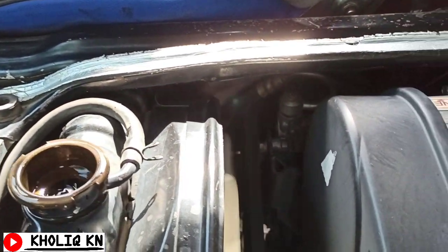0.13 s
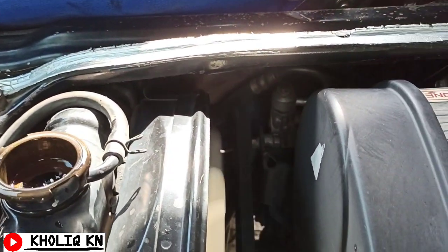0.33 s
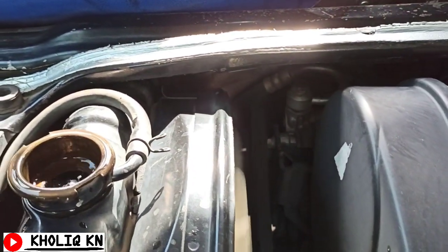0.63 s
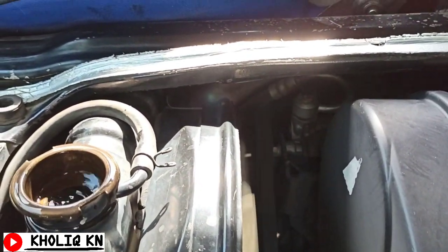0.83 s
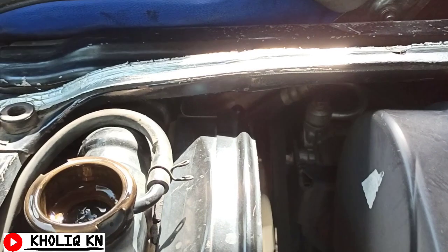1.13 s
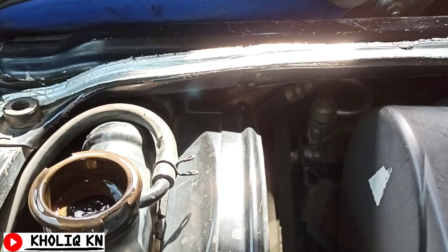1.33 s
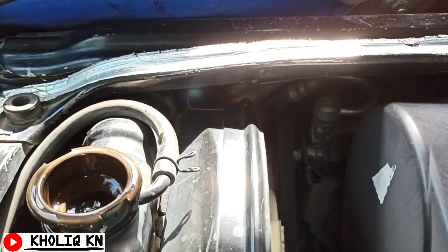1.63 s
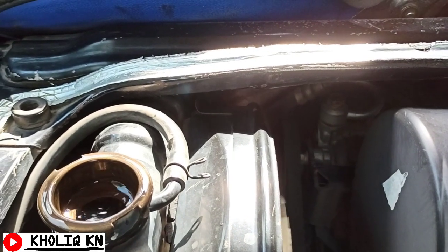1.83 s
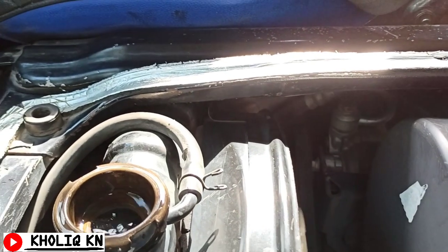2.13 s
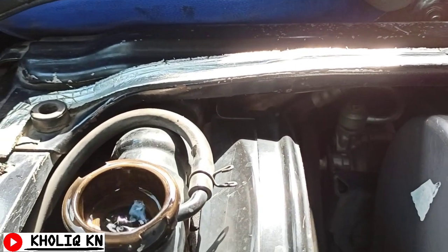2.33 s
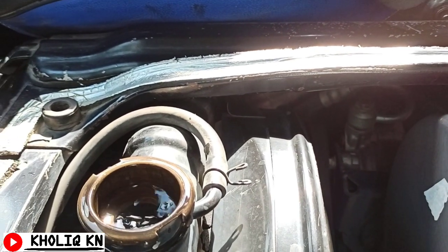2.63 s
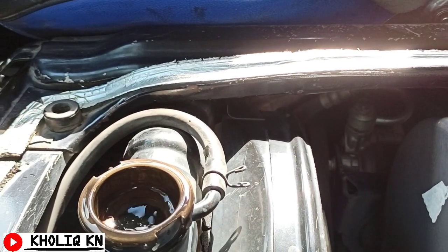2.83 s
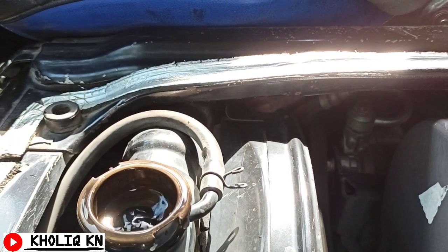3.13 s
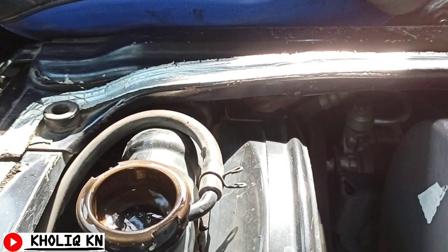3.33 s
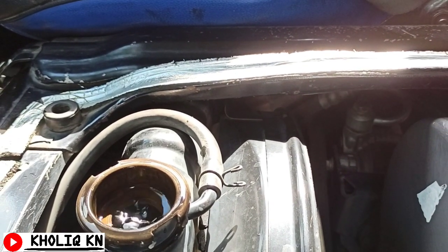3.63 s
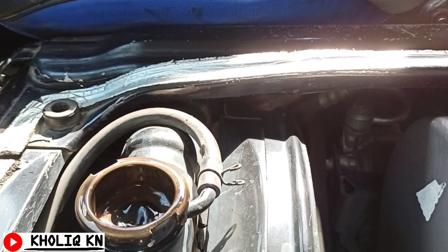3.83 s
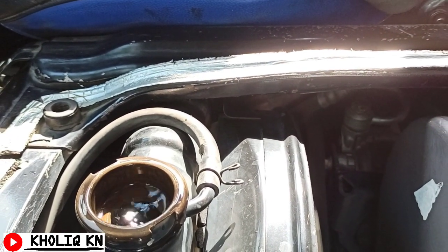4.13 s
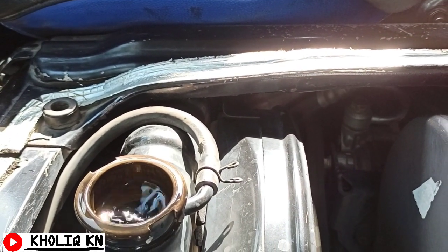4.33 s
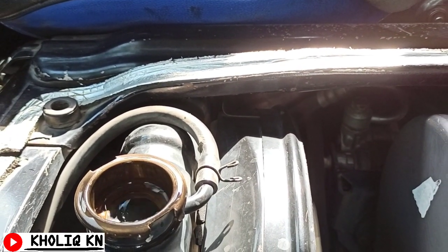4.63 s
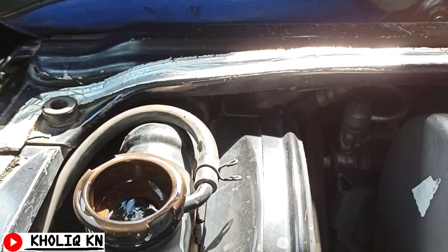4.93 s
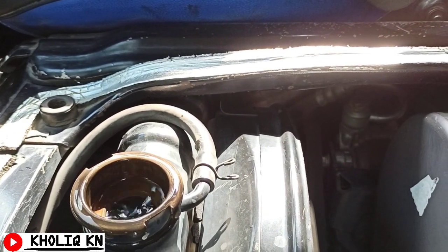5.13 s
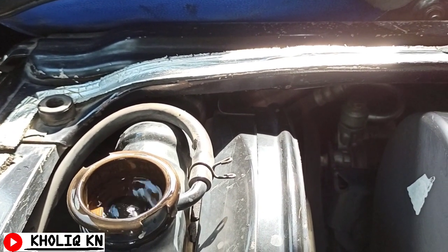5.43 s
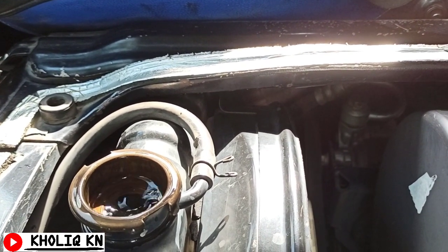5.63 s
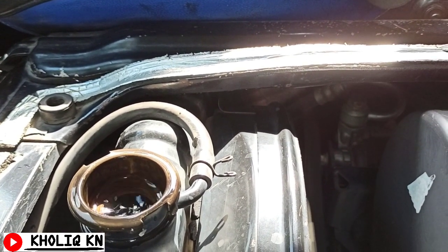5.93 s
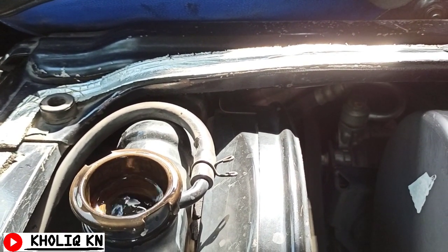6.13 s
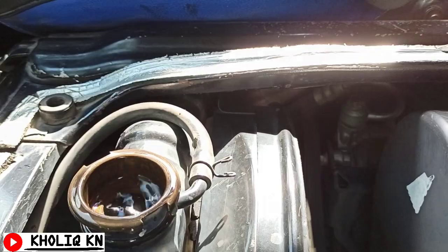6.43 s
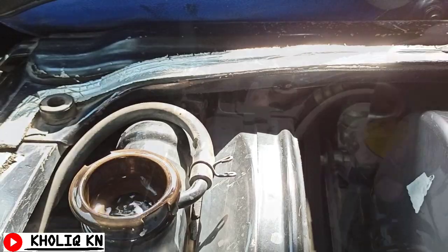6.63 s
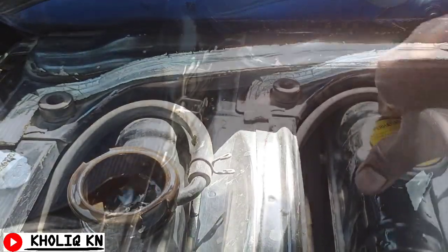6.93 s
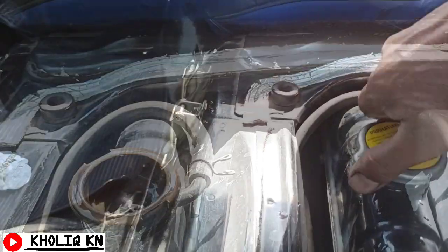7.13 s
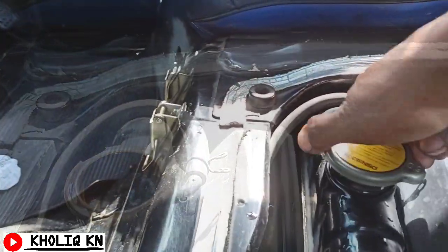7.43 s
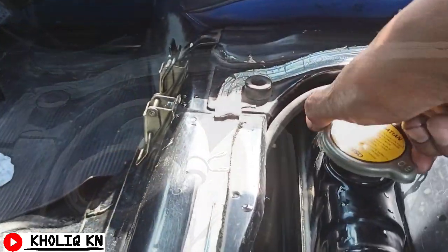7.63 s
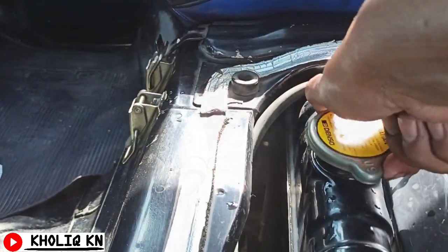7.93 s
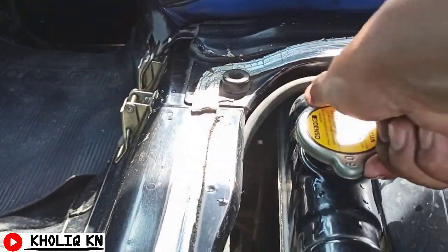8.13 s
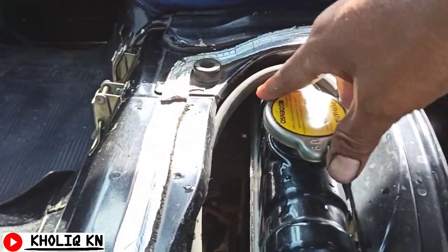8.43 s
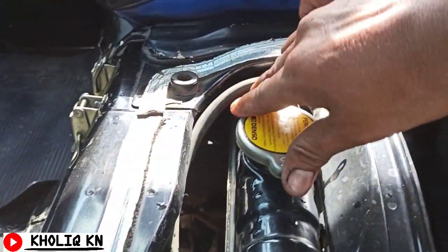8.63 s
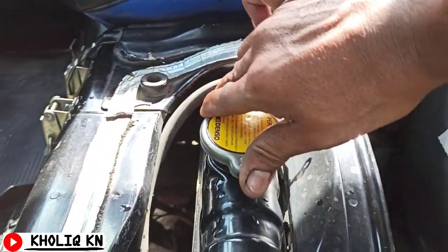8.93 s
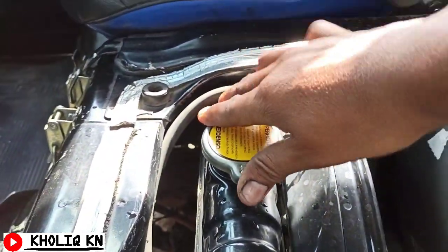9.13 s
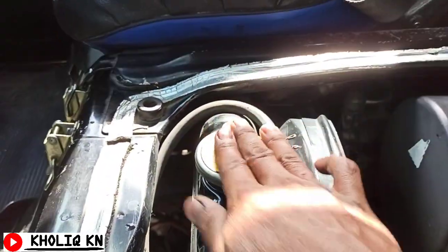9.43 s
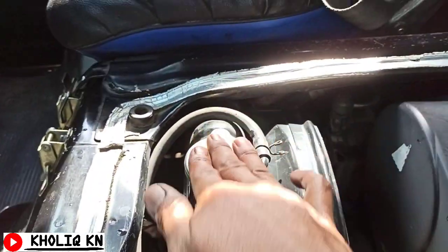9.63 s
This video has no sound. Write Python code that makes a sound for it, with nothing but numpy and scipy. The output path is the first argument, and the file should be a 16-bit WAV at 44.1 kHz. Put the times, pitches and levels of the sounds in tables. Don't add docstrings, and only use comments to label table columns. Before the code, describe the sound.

A four-cylinder diesel knocks at idle, revs up into a held roar with fan hum, dips, then clatters at idle again, with wind buffeting the left.

```python
import sys
import numpy as np
from scipy import signal
from scipy.fft import rfft, irfft
from scipy.io import wavfile
from scipy.ndimage import uniform_filter1d, map_coordinates

SR = 44100
rng = np.random.default_rng(int(sys.argv[2]) if len(sys.argv) > 2 else 0)


def volts(x):
    e = np.asarray(x, float) / 20
    return 10 ** e


def wav_record(signal):
    frames = np.transpose(np.atleast_2d(signal))
    bounded = np.clip(frames, -1, 1)
    quanta = np.round(bounded * 32767).astype(np.int16)
    wavfile.write(sys.argv[1], SR, quanta)


N = 432180
TIME, HZ = np.arange(N) / SR, np.fft.rfftfreq(N, 1 / SR)


def evened(x):
    return x / np.sqrt(np.mean(x ** 2) + 1e-20)


def read(points, hz):
    f, value = np.transpose(points)
    return np.interp(np.log(hz + 1), np.log(f + 1), value)


def curve(rows):
    return np.interp(TIME, *np.transpose(rows))


def add(mix, s, shape):
    part = mix[round(s * SR):][:len(shape)]
    part += shape[:len(part)]


def swell(since, rise_s, fall_s):
    return (1 - np.exp(-since / rise_s)) * np.exp(-since / fall_s)


def gust_shape(samples, peak_s):
    u = np.arange(samples) / SR / peak_s
    return u * np.exp(1 - u)


def ring(x, hz, width):
    r = np.exp(-np.pi * width / SR)
    return signal.lfilter([1 - r, 0, r - 1], [1, -2 * r * np.cos(2 * np.pi * hz / SR), r * r], x)


def slow(hz):
    coarse = TIME[::128]
    drift = map_coordinates(rng.standard_normal(2000), [coarse * hz * 2 + 5], order=3)
    return np.interp(TIME, coarse, evened(drift))


def noise(spectrum):
    a, b = rng.standard_normal((2, 2, len(HZ))) * np.sqrt(N / 2)
    return irfft((a + 1j * b) * volts(read(spectrum, HZ)), N)


# time in seconds, level in dB.
FADER = [
    (0.0, 0),
    (6.35, -0.5),
    (6.55, -4),
    (7.0, -9),
    (7.3, -10.5),
    (7.85, -8),
    (8.42, -2),
    (8.5, 2),
    (9.8, 0.5),
]


def fader_db():
    return curve(FADER)


def level_db(idle_db, speed_db, fast):
    return idle_db + (speed_db - idle_db) * fast ** 0.32 + fader_db()


# peak in seconds, peak level in dB, length in seconds.
GUSTS = [(0.04, -14.5, 0.016), (0.455, -9.5, 0.014), (0.673, -14, 0.023), (0.764, -3, 0.013),
         (0.969, -13, 0.017), (1.11, -14, 0.013), (1.21, -12, 0.025), (1.47, -9, 0.011),
         (1.763, -12, 0.024), (2.111, -6.5, 0.039), (3.206, -10.5, 0.0094), (3.353, -3, 0.0084),
         (3.592, -1, 0.025), (3.705, -9, 0.0098), (4.009, -6, 0.01), (4.091, -12, 0.016),
         (4.308, -11, 0.028), (4.958, 3, 0.008), (5.152, -2.5, 0.021), (5.576, -5, 0.027),
         (5.674, -9, 0.0038), (5.806, -8, 0.014), (6.13, -1.5, 0.037), (6.343, -4, 0.0095),
         (6.798, -14, 0.029), (6.948, -10.5, 0.028), (7.03, -14.5, 0.017), (7.165, -12, 0.017),
         (8.57, -14, 0.013), (9.66, -5.5, 0.016)]
# frequency in Hz, level in dB.
WIND = [(35, -44.5), (70, -6), (120, 0.5), (250, -2.5), (500, -8.5), (1000, -15.5), (2000, -32),
        (4000, -50.5)]


def buffeting(second):
    eddies_per_s, eddy_peak_s, eddy_db, spread_db = 9, 0.0089, -17, 2.5
    force = volts(-30 + 5.5 + 1.5 * slow(25))
    when, size = rng.random((2, 150))
    starts = (np.arange(len(when)) + 0.81 * when) / eddies_per_s
    extra_db = np.minimum(-spread_db * np.log(1 - size), 9)
    for s, db in zip(starts, extra_db):
        add(force, s, volts(eddy_db + db) * gust_shape(3000, eddy_peak_s))
    second_draught = volts(-42.5 + 7.5)
    force = force * np.sqrt(1 - second) + second_draught * np.sqrt(second)
    force = force * volts(fader_db())
    for s, db, length in GUSTS:
        add(force, max(s - .004, 0), volts(db - 3) * gust_shape(6000, max(0.58 * length, .004)))
    eddies = evened(noise(WIND))
    eddies = evened(eddies * (1 + .5 * abs(eddies)))
    shelter_db = np.array([[0], [-14]])
    return force * eddies * volts(shelter_db + 3.26 * slow(90))


def crank(speed, start):
    rate = curve(speed)
    turns = np.cumsum(rate) / SR
    turns = turns - turns[round(speed[0][0] * SR)] + start + 400
    return turns, rate, np.clip((rate - 30) / 26, 0, 1)


def per_firing(turns):
    return rng.standard_normal(1200)[turns.astype(int)]


def roar_level(fast):
    return volts(level_db(-32, -28.5, fast))


def puff_level(turns, rate):
    return swell((turns % 1) / rate, 0.002, 0.018) * volts(1.8 * per_firing(turns))


def tick_level(turns, rate):
    late = np.maximum((turns % 1) / rate - 0.0012 * abs(per_firing(turns)), 0)
    return swell(late, 0.0012, 0.0099) * volts(3.04 * per_firing(turns))


# frequency in Hz, level in dB per Hz.
ROAR = [(40, -54), (70, -23), (150, -22), (240, -12.5), (330, -20.5), (500, -17.5), (640, -20), (780, -15),
        (1000, -25), (2500, -29.5), (4700, -30), (7000, -28.5), (13000, -34.5), (16000, -24.5)]
PUFF = [(500, -47), (1000, -28.5), (2500, -21.5), (4700, -29.5), (7000, -29), (12000, -30.5),
        (16000, -34.5)]
TICK = [(2000, -38), (4000, -36), (7000, -22.5), (12000, -25.5), (16000, -18)]


def hiss(puff, tick, roar):
    puffs = 1.5 * puff * noise(PUFF)
    ticks = 1.2 * tick * noise(TICK)
    steady = roar * noise(ROAR) * volts(.8 * slow(20))
    return volts(40.5) * (puffs + ticks + steady)


# multiple of the blade rate, level in dB at speed.
FAN_LINES = [(1, -23.5), (2, -33.5)]


def fan(turns, fast):
    hum = np.zeros(N)
    if not fast.any():
        return hum
    blades = 4.26 * turns + .035 * slow(3)
    flicker_db = (1.2 + 9 * (1 - fast)) * slow(7)
    sag_db = 55 * (1 - fast) ** 3 + 6 * (1 - fast)
    for k, db in FAN_LINES:
        hum += volts(db + 2.5 - k * sag_db + flicker_db) * np.cos(2 * np.pi * k * blades)
    return hum


# multiple of the firing rate, level in dB at speed.
WHINE = [(20, -41), (33, -42), (40, -40), (47, -42)]


def gear_whine(turns, fast):
    slip = turns + .003 * slow(8)
    return fast ** 2 * sum(volts(db) * np.cos(2 * np.pi * k * slip) for k, db in WHINE)


# multiple of the firing rate, level in dB at idle, level in dB at speed.
ORDER_LINES = [(1, -69, -31), (2, -42, -34), (3, -33.5, -33), (4, -46.5, -37)]


def firing_orders(turns, fast):
    tone = np.zeros(N)
    for k, idle_db, speed_db in ORDER_LINES:
        tone += volts((1 - fast) * idle_db + fast * speed_db) * np.cos(2 * np.pi * k * turns)
    return tone


def drone(turns, rate, fast):
    hz, width = 243.8, 66
    orders = np.zeros(N)
    for k in range(6, 12):
        waver = volts(1.8 * slow(6))
        lift = waver / (1 + (2 * (k * rate - hz) / width) ** 4)
        orders += lift * np.cos(2 * np.pi * k * turns + np.pi / 2 * k * k + 0.34 * slow(5.6))
    return volts(-2.86 + level_db(-18.5, -18, fast) - 95 * fast) * orders


# frequency in Hz, width in Hz, level in dB, then the levels in dB
# of the four cylinders at idle and the levels in dB of the four at speed.
INTAKE = [
    (236.2, 84, -4, (-6, -4.5, -2.5, -7), (-4.5, -13.5, -12.5, -2)),
    (494.4, 31.3, -9, (2.5, -7, -7, -7), (-18.5, -10, 1.5, 5)),
    (775.6, 40.5, -3.5, (-4.5, -5.5, -6, -4), (-6, 6.5, -4.5, -3)),
]


def intake_thumps(turns, rate, fast):
    ahead = turns + .45 * fast
    valve = ahead.astype(int)
    opened = np.diff(valve, prepend=valve[0]) > 0
    since = (ahead % 1) / rate
    thumps = np.zeros(N)
    for k, (hz, width, db, idle_db, speed_db) in enumerate(INTAKE):
        share_db = (1 - fast) * np.take(idle_db, valve % 4) + fast * np.take(speed_db, valve % 4)
        flutter = .015 * k * rng.standard_normal(N) * np.exp(-since / .007)
        drive = (opened + flutter) * volts(db + share_db + .9 * per_firing(turns))
        thumps += ring(ring(drive, hz, width), hz, width)
    return thumps * volts(level_db(-18.5, -18, fast) + 55.5)


KNOCK_BY_CYLINDER_DB = (-3.5, -8.5, -2, -8)


def combustion_blows(turns, rate, fast):
    burn = np.maximum((turns % 1) / rate - .0015 * abs(per_firing(turns)), 0)
    cylinder_db = np.take(KNOCK_BY_CYLINDER_DB, turns.astype(int) % 4)
    uneven_db = 2.3 * per_firing(turns)
    blow_db = cylinder_db + uneven_db + level_db(-30.5, -35.5, fast)
    return swell(burn, 0.002, 0.007) * volts(32 + blow_db)


# time in seconds, peak level in dB.
KNOCKS = [(0.3666, -17), (0.4394, -21.5), (0.5137, -10.5), (0.5861, -15), (0.6589, -14.5), (0.6973, -10),
          (0.8081, -18), (0.8779, -15), (0.95, -13.5), (1.019, -15), (1.2214, -12), (1.284, -14),
          (1.3838, -11.5), (1.544, -15.5), (1.6097, -12.5), (1.7308, -5.5), (1.7584, -9), (4.6144, -1.5),
          (7.951, -17), (7.9868, -13), (8.134, -14), (8.2457, -18), (8.5404, -18), (8.7567, -11.5),
          (8.977, -8.5), (9.16, -7), (9.194, -13.5), (9.416, -10), (9.5608, -3.5), (9.7118, -21)]


def loud_knocks():
    blow, t = np.zeros(N), np.arange(1200) / SR
    for s, db in KNOCKS:
        add(blow, s, volts(db + 10.5) * swell(t, 0.0016, 0.0094))
    return blow


# frequency in Hz, width in Hz, level in dB.
BLOCK = [(1180, 55, -18.5), (1500, 250, -14), (1836, 300, -5), (2320, 81, 3), (2677, 190, 2),
         (3000, 83, -10.5), (3620, 34, -15.5), (4310, 650, -17)]


def block(blow):
    rattle = blow * rng.standard_normal((2, N))
    tilt = volts(4 * slow(14))
    ringing = np.zeros((2, N))
    for hz, width, db in BLOCK:
        ringing += volts(db) * ring(rattle * tilt ** np.log2(hz / 2400), hz, width)
    return ringing


def engine(speed, start):
    turns, rate, fast = crank(speed, start)
    roar = roar_level(fast)
    lines = firing_orders(turns, fast) + fan(turns, fast) + gear_whine(turns, fast)
    tones = intake_thumps(turns, rate, fast) + volts(32.5) * roar * lines + drone(turns, rate, fast)
    puff = roar * puff_level(turns, rate)
    tick = roar * tick_level(turns, rate)
    return np.array([tones, puff, tick, combustion_blows(turns, rate, fast), roar])


# frequency in Hz, level in dB.
LEFT_DB = [(60, 0), (300, -2.5), (1200, 0.5), (2500, -4), (5500, -4), (15000, -10)]
# frequency in Hz, likeness from 0 to 1.
SAME = [(60, 0.96), (250, 0.97), (400, 0.35), (780, 0.66), (1500, 0.26), (2700, 0.05), (4000, 0.034),
        (8000, .05)]


def ports(x, other):
    lead_s = 19 / SR
    same = np.clip(read(SAME, HZ), 0, 1)
    shared = same * rfft(x) * np.exp(2j * np.pi * HZ * lead_s)
    left = shared + np.sqrt(1 - same ** 2) * rfft(other)
    return np.array([irfft(left * volts(read(LEFT_DB, HZ)), N), x])


# time in seconds, firings per second.
SPEED_A = [(0.0, 27.1), (0.8, 27.39), (1.0, 28.28), (1.2, 31.41), (1.4, 30.72), (1.6, 30.58), (1.8, 38.23),
           (2.0, 45.37), (2.2, 49.54), (2.4, 53.1), (2.6, 55.65), (2.8, 56.76), (4.0, 57.09), (4.5, 56.44),
           (5.0, 56.69), (6.0, 56.85), (7.0, 56.31), (7.5, 57.24)]
SPEED_B = [(7.5, 27.36), (8.0, 27.25), (8.5, 27.2), (9.0, 27.39), (9.4, 27.2), (9.8, 27.45)]
# time in seconds, share of the second shot from 0 to 1.
FADE = [
    (6.45, 0.0),
    (6.7, 0.04),
    (7.2, 0.03),
    (7.6, 0.84),
    (8.0, 0.99),
    (8.3, 1),
]


def scene():
    second = np.clip(curve(FADE), 0, 1)
    first_shot = np.sqrt(1 - second) * engine(SPEED_A, .06)
    second_shot = np.sqrt(second) * engine(SPEED_B, -.3)
    tones, puff, tick, blow, roar = first_shot + second_shot
    heard = ports(*(tones + hiss(puff, tick, roar) + block(blow + loud_knocks())))
    second_pan_db = (1.9, -0.7)
    return heard * volts(np.outer(second_pan_db, second)) + buffeting(second)


# lower edge in Hz, step in dB left, step in dB right.
STEPS = [(4730, -3.5, -6.5), (6250, 2.5, 8), (7710, 0, -8.5), (8610, -61.5, -58.5), (11573, 60, 60.5),
         (15300, -52, -52.5)]


def stepped_treble(x):
    steps_db = sum(np.outer(db, np.clip((HZ - hz) / 120 + .5, 0, 1)) for hz, *db in STEPS)
    return irfft(rfft(x) * volts(steps_db), N)


def holes(x):
    hz, _, z = signal.stft(x, SR, nperseg=1024, noverlap=512)
    power = (abs(z) ** 2).mean(0)
    power = uniform_filter1d(uniform_filter1d(power, size=4, axis=0), size=3, axis=1)
    dull = ((hz > 4800) & (hz < 6100))[:, None]
    usual = (power * dull).sum(0) / dull.sum()
    weak = dull & (power < .68 * usual)
    weak = uniform_filter1d(1. * weak, size=3, axis=1) > .1
    return signal.istft(z * ~weak, SR, nperseg=1024, noverlap=512)[1][:, :N]


# time in seconds, peak level in dB, frequency in Hz.
FLICKERS = [(0.5462, -59, 10700), (0.6908, -49, 9000), (0.8664, -51, 9000), (1.1558, -43, 9160),
            (1.2795, -54, 9000), (1.4197, -49, 8900), (1.5434, -50, 9100), (1.6666, -51, 9100),
            (2.7102, -47, 9260), (6.1494, -58, 10900), (7.9493, -56, 10000), (8.1174, -51, 9100),
            (8.4637, -46, 9000), (8.5729, -42, 8960), (8.6223, -49, 9130), (8.738, -44, 9150),
            (8.9251, -50, 9210), (8.961, -39, 9250), (9.1376, -45, 9050), (9.1556, -49, 9900),
            (9.3741, -45, 9116), (9.4489, -50, 9000), (9.5153, -42, 8950), (9.5594, -56, 10600),
            (9.623, -40, 9200)]


def flickers():
    out, window = np.zeros(N), np.hanning(1800)
    for s, db, hz in FLICKERS:
        grain = ring(ring(rng.standard_normal(len(window)), hz, 200), hz, 200)
        add(out, max(s - .01, 0), volts(db - 5.5) * evened(grain) * window)
    return out


def top_cut(x):
    return signal.sosfilt(signal.butter(12, 16510, fs=SR, output="sos"), x)


def record(dry):
    power_db = 10 * np.log10(abs(uniform_filter1d(dry ** 2, 900)) + 1e-12)
    excess_db = np.maximum(power_db + 9.5, 0)
    ducked = dry / volts(0.34 * uniform_filter1d(excess_db, 900))
    limited = 1.05 * np.tanh(ducked / 1.05)
    finished = holes(stepped_treble(limited)) + flickers()
    return top_cut(np.clip(finished, -1, 1))


dry = scene()
out = record(dry)
wav_record(out)
```